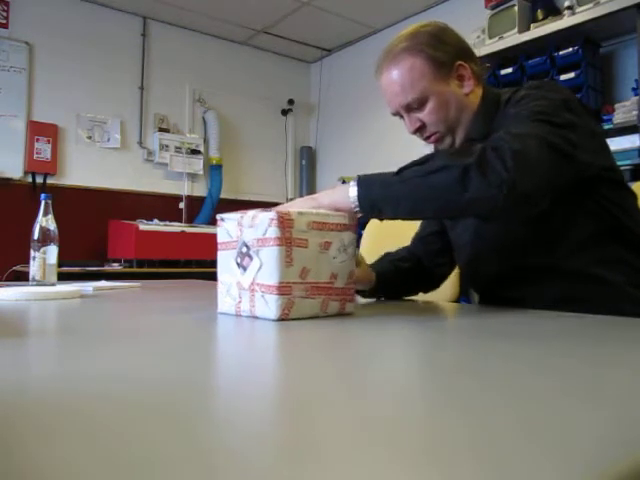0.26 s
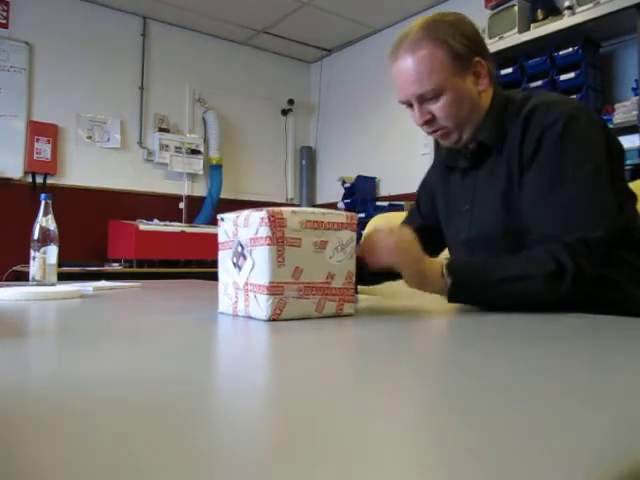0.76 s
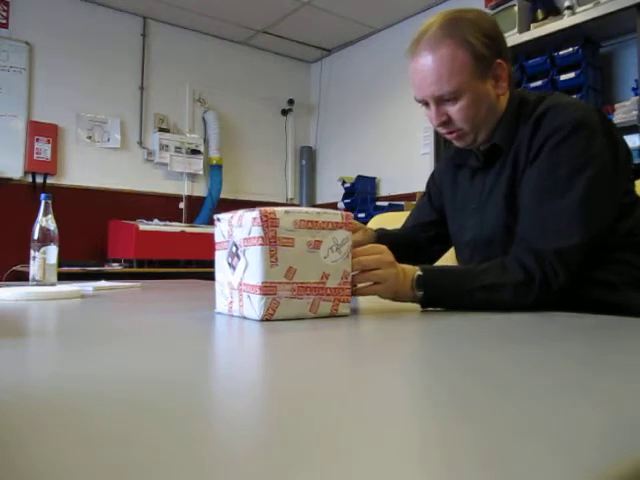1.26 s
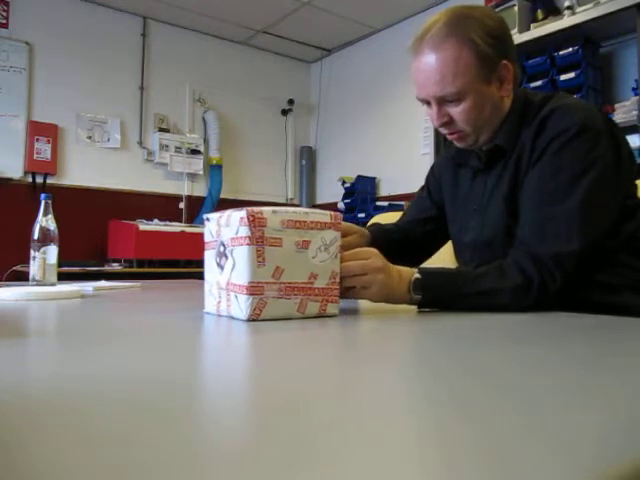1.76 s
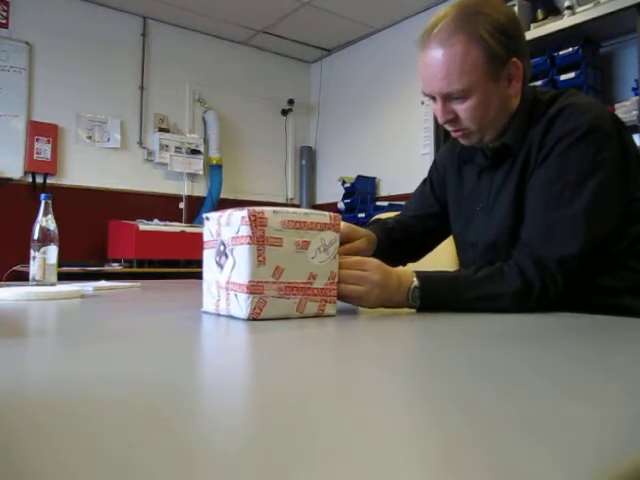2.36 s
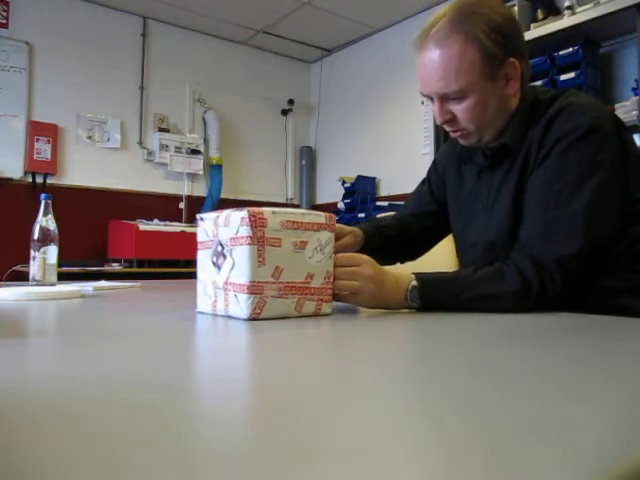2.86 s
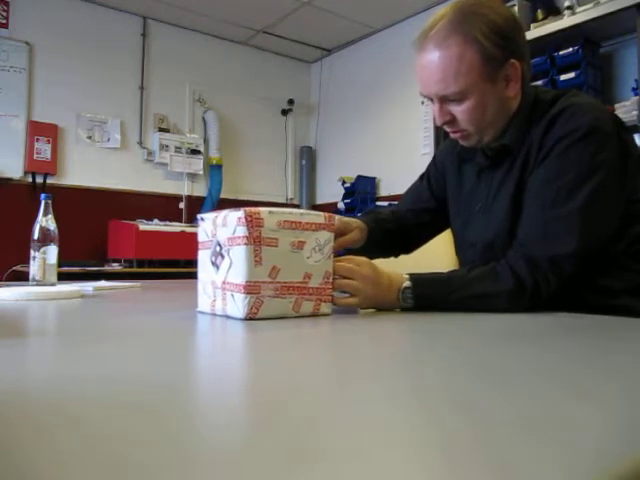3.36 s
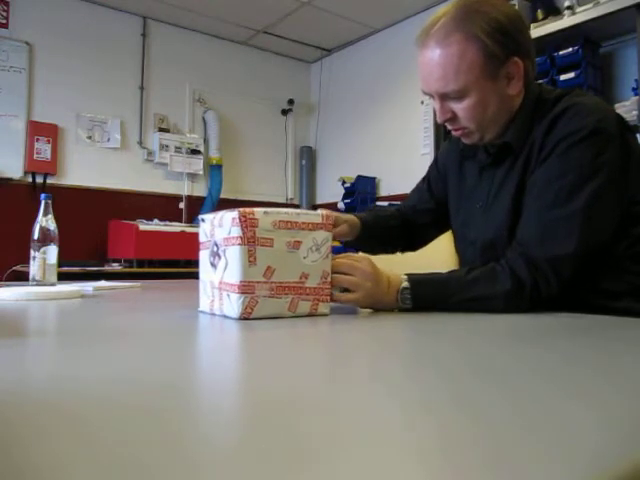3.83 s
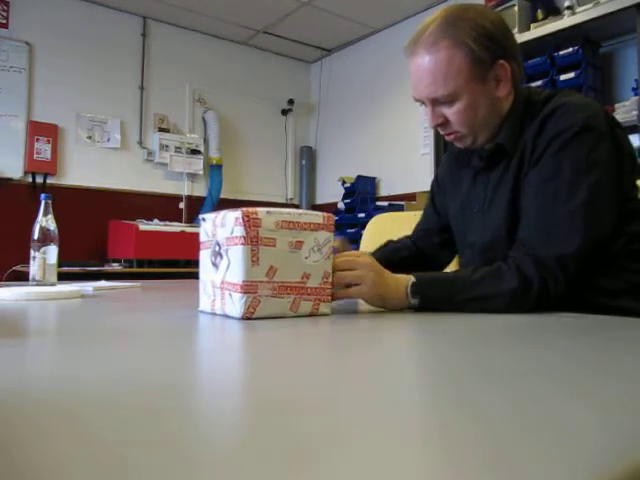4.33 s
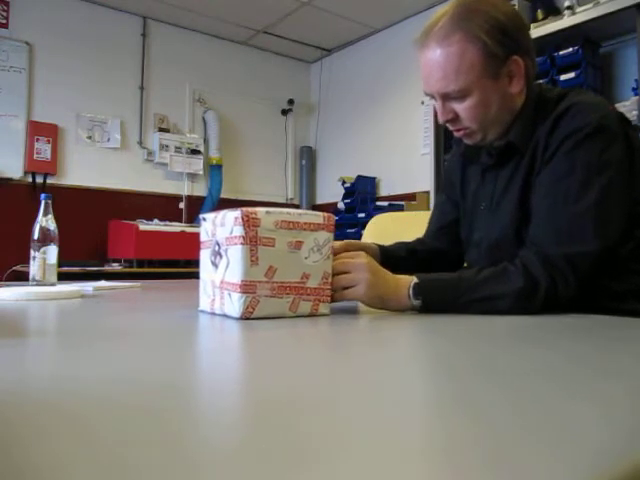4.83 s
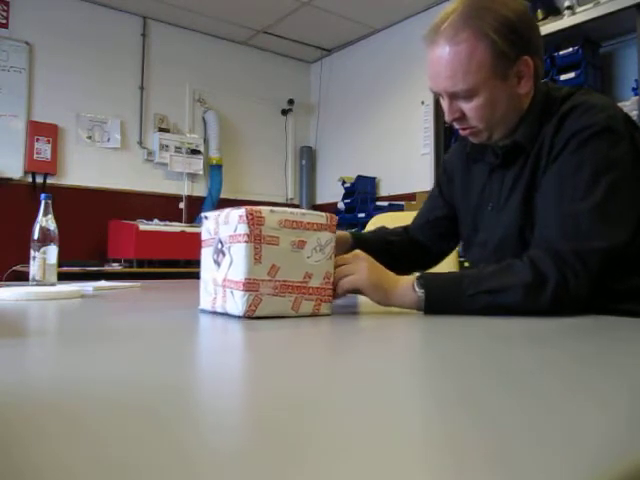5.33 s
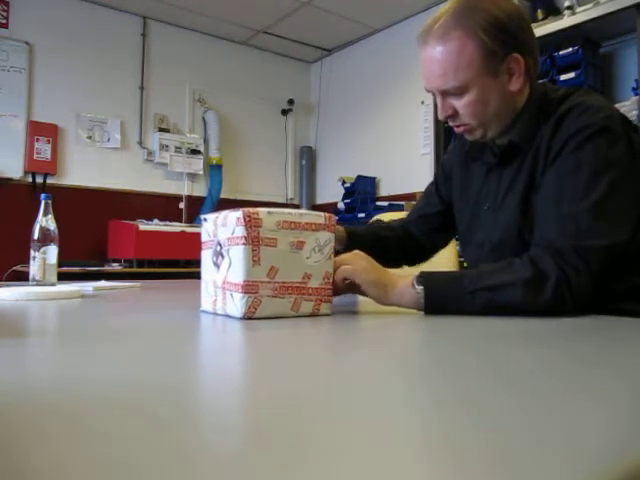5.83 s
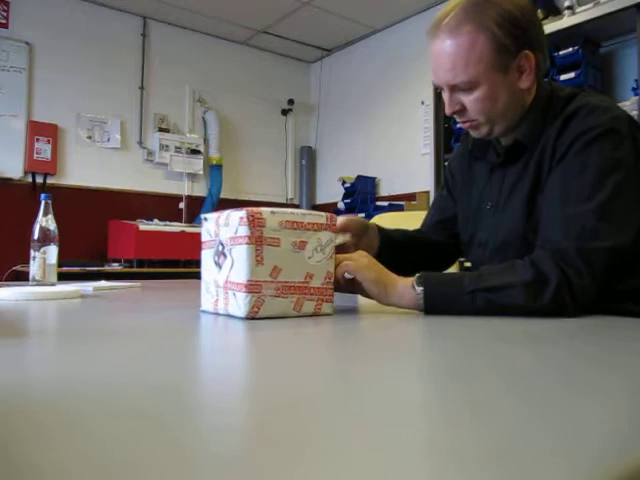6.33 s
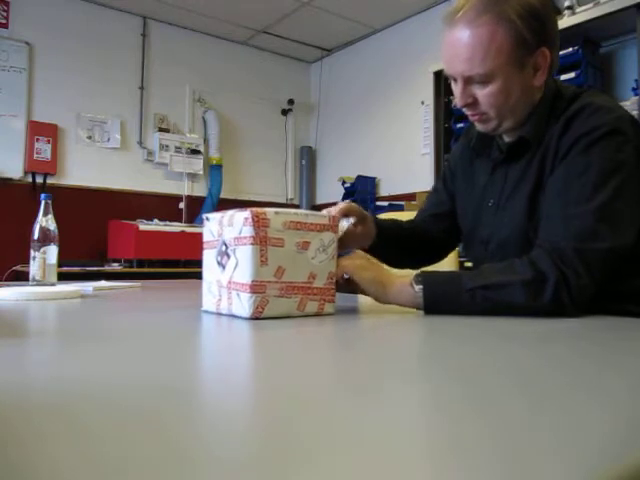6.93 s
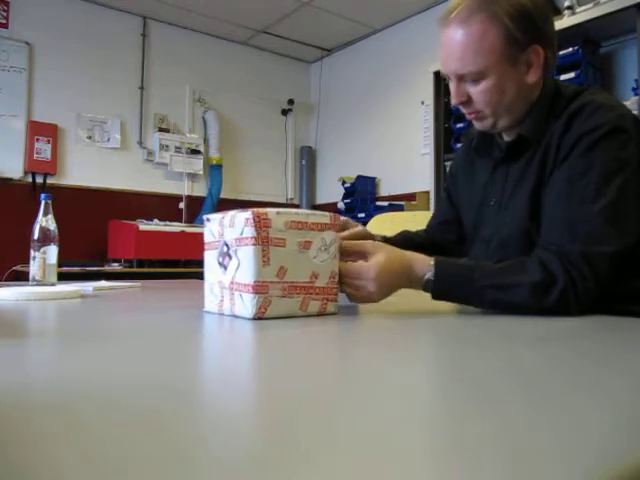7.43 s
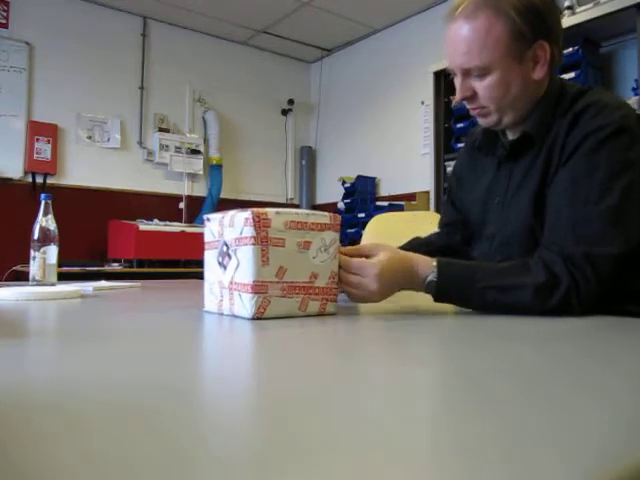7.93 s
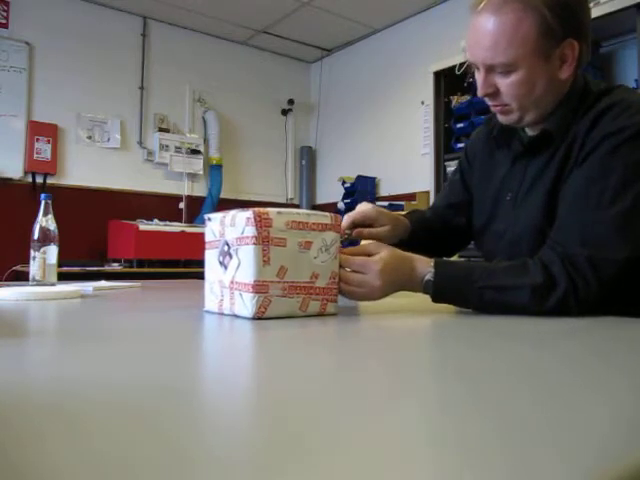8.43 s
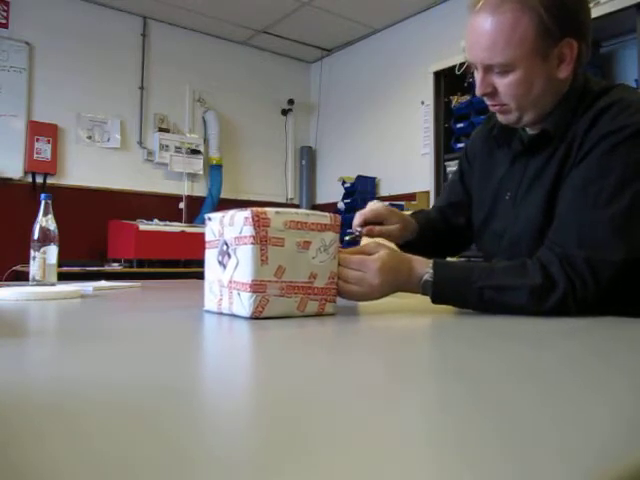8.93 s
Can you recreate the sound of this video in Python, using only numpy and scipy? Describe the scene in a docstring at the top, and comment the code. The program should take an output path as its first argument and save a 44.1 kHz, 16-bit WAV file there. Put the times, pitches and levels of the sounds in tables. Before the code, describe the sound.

A close microphone at a table in a quiet workshop, with faint hiss, low rumble and a short diffuse tail. From 0 to 0.4 s fingers brush grainily over paper wrapping, with small snaps and a dull box boom. At about 0.5 to 0.7 s a thin squeak leads into a woody, knocking chair creak. Around 1.2 s come tiny tape ticks, then soft rubbing and sparse crackles. A sharp bright snap lands at 2.46 s, and the rumble briefly dips. Gentle rustling swells near 3.6 s. At 4.23 to 4.31 s a taut flap pops four times quickly. From 5 to 7.1 s crinkling is busiest, crackling densely, with a strong snap at 6.62 s and dull box flexes. A weaker creak at 7.65 to 7.8 s precedes ticking tape runs until 8.5 s. Final rustles and crisp snaps cluster at 8.6 to 8.8 s, then fade to room air.

```python
"""A quiet workshop, heard from close to a table where hands pick open a paper-wrapped cardboard parcel.
Behind it lie faint air hiss, a low rumble whose level dips early on, one early echo and a short diffuse tail.
Twice something creaks dully, probably the chair: stick-slip knocks ring its frame as the sitter shifts.
Box walls boom as narrow noise, a taut flap pops as struck modes, and tape lets go in runs of tiny ticks.
Nearest, fingers rub the wrapping as grainy coloured noise, and creases snap as bursts with a ringing fold."""
import sys
import numpy as np
from scipy import signal
from scipy.fft import rfft, irfft, next_fast_len
from scipy.io import wavfile

SR = 44100
rng = np.random.default_rng(int(sys.argv[2]) if len(sys.argv) > 2 else 0)


def master_out(mix):
    """Clip the mix to full scale and print it as 16-bit PCM to the path in sys.argv[1]."""
    frames = np.transpose(np.atleast_2d(mix))
    ceiling = np.clip(frames, -1, 1)
    pcm = np.round(ceiling * 32767).astype(np.int16)
    wavfile.write(sys.argv[1], SR, pcm)


N = 405279
TIME = np.arange(N) / SR


def from_db(db):
    """Amplitude ratio of a level in dB."""
    return 10 ** (np.asarray(db) / 20)


def rms_one(x):
    """The signal scaled to rms 1."""
    return x / np.sqrt(np.mean(x ** 2) + 1e-20)


def in_time(rows):
    """Each column of a curve at every sample."""
    s, *columns = np.transpose(rows)
    return [np.interp(TIME, s, c) for c in columns]


def at_hz(points, hz, axis=1):
    """One column of a spectrum, read on a log-frequency axis."""
    points = np.array(points)
    return np.interp(np.log(hz), np.log(points[:, 0]), points[:, axis])


def pitched(rows, ratio):
    """The same modes or spectrum at another pitch."""
    return [(hz * ratio, *rest) for hz, *rest in rows]


def band(x, low, high, order=2):
    """Only the part between two frequencies in Hz."""
    sos = signal.butter(order, [low, min(high, .48 * SR)], "band", fs=SR, output="sos")
    return signal.sosfilt(sos, x + 1e-18)


def coloured(x, spectrum):
    """Gives a flat excitation a spectrum, rolled off below 20 Hz; rms 1."""
    size = next_fast_len(N)
    hz = np.maximum(np.arange(size // 2 + 1) * SR / size, 1)
    gain = from_db(at_hz(spectrum, hz)) * np.minimum(hz / 20, 1)
    return rms_one(irfft(rfft(x, size) * gain, size)[:N])


def drift(rate):
    """Smooth chance of spread 1, with `rate` new values per second."""
    return rms_one(np.interp(TIME * rate, np.arange(N // 20), rng.standard_normal(N // 20)))


def ring(clicks, hz, t60):
    """A resonator: a unit click sets a sine of height 1 ringing."""
    r = from_db(-60 / (t60 * SR))
    w = 2 * np.pi * hz / SR
    return signal.lfilter([0, np.sin(w)], [1, -2 * r * np.cos(w), r * r], clicks + 1e-18)


def strike(events, modes, vary_db, vary_pitch=0):
    """Every blow (t/s, level/dB) excites each mode with a strength, and perhaps a pitch, of its own."""
    hz, mode_db, t60 = np.transpose(modes)[:, :, None]
    t = TIME[:int(1.5 * t60.max() * SR)]
    out = np.zeros(N + SR)
    signs = (-1) ** np.arange(len(hz))[:, None]   # neighbouring modes start in opposite phase
    dying = signs * from_db(mode_db - 60 * t / t60)
    chances = rng.standard_normal((64, 2, len(hz), 1))
    for (s, db), (strength, detune) in zip(events, chances):
        sines = np.sin(2 * np.pi * hz * (1 + vary_pitch * detune) * t)
        rings = dying * from_db(db + vary_db * strength) * sines
        start = int(s * SR)
        out[start:start + len(t)] += rings.sum(axis=0)
    return out[:N]


def swell(t, rise, fall, depth_db, shape):
    """Level in dB of a gesture t seconds after its start: up to 0 dB, then away again."""
    away = np.maximum((rise - t) / max(rise, 1e-3), (t - rise) / max(fall, 1e-3))
    return -depth_db * np.abs(away) ** shape


# spectrum of the still air: f/Hz, relative level/dB per Hz
AIR = [(15, -38), (25, -1), (99, -6), (134, -7.5), (223, -11.5), (775, -16), (863, -20.5), (6050, -31),
       (7920, -29), (16000, -41)]
# level of the low rumble, which drops suddenly near 2.5 s and then partly returns: t/s, level/dB
RUMBLE_LEVEL = [(0, -54), (2.44, -53.5), (2.52, -68), (3.3, -57.5), (9.2, -59)]
AIR_DB = -57


def room_air(rumble_hz):
    """A faint steady hiss over a low rumble, both shaped from noise; the rumble's level dips and returns."""
    hiss = from_db(AIR_DB) * coloured(rng.standard_normal(N), AIR)
    rumble = rms_one(band(rng.standard_normal(N), rumble_hz / 2, rumble_hz * 2))
    return hiss + from_db(in_time(RUMBLE_LEVEL)[0]) * rumble


# diffuse tail of the workshop: f/Hz, t60/s, level/dB
ROOM = [(149, 0.71, -6), (600, 0.33, -3), (3970, 0.33, -12.5), (8900, 0.39, -3.5), (16000, 0.194, -35)]
# a near surface: delay t/s, gain (ratio)
ECHOES = [(0.014, 0.14)]


def workshop(x, build_s):
    """One near echo, and a diffuse tail that lasts longest in the bass and shortest at the very top."""
    t = TIME[:SR // 2]
    edges = np.geomspace(90, 18000, 12)
    response = np.zeros(len(t))
    for low, high in zip(edges, edges[1:]):
        hz = np.sqrt(low * high)
        fade = from_db(-60 * t / at_hz(ROOM, hz)) * (1 - np.exp(-t / build_s))
        level = from_db(at_hz(ROOM, hz, axis=2)) / np.sqrt(np.sum(fade ** 2))
        response += band(rng.standard_normal(len(t)), low, high) * fade * level
    for delay, gain in ECHOES:
        response[int(delay * SR)] += gain
    return signal.fftconvolve(x, response)[:N]


# a thin squeak before the first creak: t/s, length t/s, f/Hz, level/dB
SQUEAK = (.465, .024, 2180, -43)


def squeak(t60):
    """The joint rubs at one narrow pitch just before it breaks loose: noise through a resonator."""
    s, length, hz, db = SQUEAK
    rubbing_time = (TIME > s) & (TIME < s + length)
    rubbed = ring(rng.standard_normal(N) * rubbing_time, hz, t60)
    # the level holds over the squeak's own length
    return from_db(db) * rms_one(rubbed) * np.sqrt(length * SR / N)


# pushes on the creaking seat: start t/s, rise t/s, fall t/s, ring level/dB and groan level/dB (relative),
# slips per s, pitch ratio of the ring
PUSHES = [(0.4884, 0.0011, .01, -25.5, -47, 130, 0.94), (.5, 0.018, 0.022, -29, -60, 230, 0.98),
          (.52, 0.019, 0.042, -24.5, -56, 250, 1), (.552, .014, 0.061, -33, -46, 230, 1.1),
          (.615, 0.025, 0.009, -39, -45.5, 260, 1.28), (.72, .022, 0.018, -46, -64, 190, 0.94),
          (7.651, 0.0017, 0.061, -42.5, -45, 207, 0.97), (7.696, 0.0075, .02, -34.5, -56, 240, 0.89),
          (7.738, 0.019, 0.012, -39.5, -54, 230, 0.97), (7.783, 0.011, 0.019, -36.5, -55, 233, 0.795)]
# bright modes of the frame, before the pitch ratio: f/Hz, relative level/dB, t60/s
CREAK_RING = [(973, -4.5, 0.016), (1166, -1.5, 0.015), (1278, 1, 0.013), (1570, -1.5, 0.014),
              (2210, -16, 0.016), (3030, -13, 0.0049)]
# its low modes: f/Hz, relative level/dB, t60/s
CREAK_GROAN = [(136, -15, 0.012), (263, 6, 0.017), (424, 2.5, 0.042), (670, 13, 0.0098)]
PUSH_DEPTH_DB = 13   # a push climbs this far, then falls as far


def creak(jitter, ring_db, groan_db, soft_hz):
    """Under each push a joint sticks and slips unevenly; every slip is a soft knock that rings the frame."""
    frame = 0
    for start, rise, fall, bright_db, low_db, slips_per_s, pitch in PUSHES:
        waits = np.exp(jitter * rng.standard_normal(size=40)) / slips_per_s
        t = np.cumsum(waits)
        t = t - t[len(t) // 2] + rise   # one slip comes at the height of the push
        t = t[(t >= 0) & (t <= rise + 1.4 * fall)]
        db = swell(t, rise, fall, PUSH_DEPTH_DB, 1)
        bright = np.c_[start + t, db + bright_db + ring_db]
        low = np.c_[start + t, db + low_db + groan_db]
        frame = frame + strike(bright, pitched(CREAK_RING, pitch), vary_db=4)
        frame = frame + strike(low, CREAK_GROAN, vary_db=2)
    return band(frame, 79, soft_hz, order=3)


# box walls booming dully as they are pressed: start t/s, rise t/s, fall t/s, f/Hz, peak level/dB
FLEXES = [(.185, 0.0085, 0.11, 232, -39.5), (3.63, 0.033, 0.11, 250, -39.5), (6.05, 0.033, 0.024, 265, -38),
          (6.15, 0.017, 0.032, 490, -35), (6.765, 0.014, 0.052, 560, -43.5), (8.715, 0.037, 0.11, 377, -42)]


def flexing(width, depth_db):
    """A pressed wall of the box rumbles in a narrow band of noise that swells and fades."""
    noise = rng.standard_normal(N)
    out = np.zeros(N)
    for s, rise, fall, hz, db in FLEXES:
        rumble = rms_one(band(noise, hz / (1 + width), hz * (1 + width)))
        out = out + from_db(db + swell(TIME - s, rise, fall, depth_db, 1)) * rumble
    return out


# the flap popping against the box: t/s, relative level/dB, pitch ratio (a taut flap rings higher)
KNOCKS = [(4.2314, -6, 1.05), (4.2551, -5.5, 0.94), (4.284, -14.5, 1), (4.3063, -14, 1)]
# the box and its taut wrapping, before the pitch ratio: f/Hz, relative level/dB, t60/s
BOX = [(269, -19, 0.18), (418, -25, 0.054), (902, -18, 0.045), (1110, 1, 0.004), (1210, -28, 0.02),
       (1550, 1, 0.0091), (1710, -13.5, 0.096), (1910, -4, 0.017)]
# the flap shivering after each pop, before the pitch ratio: f/Hz, relative level/dB per Hz
SHIVER = [(150, -40), (400, -11.5), (1100, 0), (1750, -5), (2300, -9), (2900, -6.5), (4500, -6.5),
          (8000, -23), (16000, -56)]


def flap(pop_db, shiver_db, shiver_t60):
    """Each pop strikes the box and leaves the crumpled sheet shivering for a moment as fading noise."""
    pops = shiver = 0
    for s, db, pitch in KNOCKS:
        pops = pops + strike([(s, db)], pitched(BOX, pitch), vary_db=2.5)
        shaking = (TIME > s) * from_db(db - 60 * np.abs(TIME - s) / shiver_t60)
        shiver = shiver + shaking * coloured(rng.standard_normal(N), pitched(SHIVER, pitch))
    return from_db(pop_db) * band(pops, 430, 3330) + from_db(shiver_db) * shiver


# tape letting go of the paper in runs of ticks: start t/s, length t/s, ticks per s at first,
# relative level/dB of the first tick, low ring f/Hz, low ring level/dB, high ring f/Hz
PEELS = [(1.167, .005, 100, -26, 5600, -11, 9300), (1.176, .015, 90, -20, 5600, -12, 9400),
         (7.849, .022, 105, -42, 4800, 4, 9000), (7.888, .045, 90, -34, 4900, 0, 9100),
         (7.942, .053, 80, -29, 5350, -5, 9200), (8.017, .072, 96, -27.5, 5400, -6, 9200),
         (8.1, .055, 92, -33, 5100, -2, 10300), (8.202, .039, 52, -31, 5650, -5, 10300),
         (8.3185, .03, 44, -35, 5700, -5, 10200), (8.409, .019, 77, -34.5, 5700, -5, 10100),
         (8.51, .02, 67, -35, 5700, -5, 10100)]
# overtone of the high ring: pitch ratio, relative level/dB, t60/s
TAPE_OVERTONE = (1.3, -2, 0.0011)
TAPE_LOW_T60_S, TAPE_HIGH_T60_S = 0.0022, 0.0039
PEEL_FADE_DB = 6   # the tension eases over each run
PEEL_HURRY = .86   # below 1 the ticks come ever faster
TICK_VARY_DB, TICK_VARY_PITCH = 2, 0.018   # no two ticks are quite alike


def peeling(hollow_hz, hollow_width_hz):
    """Each run ticks ever faster and weaker; the strip's rings shift from run to run, a hollow between them."""
    out = np.zeros(N)
    over_ratio, over_db, over_t60 = TAPE_OVERTONE
    for s, length, rate, db, low_hz, low_db, high_hz in PEELS:
        t = np.arange(12) ** PEEL_HURRY / rate
        t = t[t < length]
        modes = [(low_hz, low_db, TAPE_LOW_T60_S),
                 (high_hz, -3.5, TAPE_HIGH_T60_S),
                 (high_hz * over_ratio, over_db, over_t60)]
        ticks = np.c_[s + t, db - PEEL_FADE_DB * t / length]
        out = out + strike(ticks, modes, TICK_VARY_DB, TICK_VARY_PITCH)
    notch = signal.iirnotch(hollow_hz, hollow_hz / hollow_width_hz, fs=SR)
    return band(signal.lfilter(*notch, out), 2000, 14800)


def friction(grains_per_s, spread_db, grain_share):
    """Fibres catching and breaking: separate grains of uneven size in a fine noise."""
    sizes = from_db(spread_db * np.minimum(rng.exponential(1, N), 4))
    caught = rng.random(N) < grains_per_s / SR
    grains = rms_one(caught * sizes * rng.choice([-1, 1], N))
    share = np.clip(grain_share, 0, 1)   # of the power
    return np.sqrt(share) * grains + np.sqrt(1 - share) * rng.standard_normal(N)


# strokes of the fingers over the paper: start t/s, rise t/s, fall t/s, relative hiss level/dB,
# relative level/dB of the sheet's body as it is pressed
STROKES = [(-.05, 0.058, 0.092, -40, -51), (.11, 0.064, 0.17, -34.5, -46), (.16, 0.096, 0.26, -33.5, -48.5),
           (.5, 0.06, 0.18, -51, -44), (.8, 0.17, 0.13, -57, -68), (1.14, 0.073, 0.27, -43, -55.5),
           (1.26, 0.067, 0.19, -35.5, -47), (1.515, 0.016, 0.65, -48, -55), (2.08, 0.13, 0.18, -46, -59),
           (2.33, 0.17, 0.19, -47.5, -45.5), (2.55, 0.046, 0.21, -46, -77), (2.84, 0.22, 0.35, -54.5, -52),
           (3.42, 0.054, 0.25, -48.5, -53), (3.55, 0.12, 0.12, -38, -40), (3.7, 0.17, 0.32, -54, -51.5),
           (4.4, 0.15, 0.12, -55, -48), (4.77, 0.033, 0.42, -50, -48.5), (4.99, 0.073, 0.2, -39, -37),
           (5.12, 0.11, 0.12, -57, -38.5), (5.29, 0.15, 0.1, -35, -32), (5.53, 0.023, 0.11, -42, -50),
           (5.77, 0.049, 0.3, -46, -47.5), (5.9, 0.057, 0.052, -40, -41.5), (6, 0.06, 0.18, -55, -40.5),
           (6.11, 0.07, 0.1, -41, -40), (6.2, 0.18, 0.051, -37, -36), (6.42, 0.024, 0.085, -48.5, -37),
           (6.519, 0.089, 0.068, -33.5, -37.5), (6.94, .06, 0.49, -52, -49.5),
           (7.06, 0.043, 0.14, -39, -36.5), (7.17, 0.15, 0.066, -48, -59), (7.85, 0.11, 0.074, -48.5, -68),
           (8.6, 0.036, 0.24, -44, -49), (8.66, 0.062, 0.15, -39.5, -43)]
# the hands never quite rest on the paper: t/s, relative hiss level/dB, relative body level/dB
HOLDING = [(0, -59.5, -61), (4.6, -58, -58.5), (4.72, -65.5, -67.5), (4.9, -63, -51.5), (7, -55, -59.5),
           (7.5, -59, -60.5), (8.5, -74, -64.5), (9.19, -84, -67)]
STROKE_DEPTH_DB, STROKE_SHAPE = 26, 1.203   # climbs this far, then falls as far; shape 1 is pointed, 2 is round


def hand_effort():
    """Gains of hiss and body: the strokes add in power to the light touch of the holding hands."""
    t = TIME[::40]   # gestures are slow enough for a coarse clock
    s, *held = np.transpose(HOLDING)
    power = from_db([np.interp(t, s, db) for db in held]) ** 2
    for start, rise, fall, *db in STROKES:
        gesture_db = swell(t - start, rise, fall, STROKE_DEPTH_DB, STROKE_SHAPE)
        power = power + from_db(np.array(db)[:, None] + gesture_db) ** 2
    return [np.interp(TIME, t, np.sqrt(p)) for p in power]


# colour of the light rubbing: f/Hz, relative level/dB per Hz
HISS = [(1000, -16.5), (2000, -9), (3200, -0.5), (7000, -1.5), (9300, 1.5), (11000, -7), (13000, -16.5),
        (16000, -30)]
# colour of the pressed sheet: f/Hz, relative level/dB per Hz
BODY = [(90, -41), (180, -3.5), (250, 9.5), (320, -2), (430, 2), (850, -3), (1500, 1), (2600, -2),
        (8000, -30)]
CRINKLES_PER_S, CRINKLE_DB = 40, -8   # tiny stray folds giving way under the fingers


def rubbing(hiss_db, body_db, crackle_db, flutter_db):
    """Light strokes hiss with stray crinkles; a pressed sheet crackles and sounds with its whole body."""
    hiss, body = hand_effort()
    sliding = friction(grains_per_s=3000, spread_db=5.0, grain_share=.2)
    crumpling = friction(grains_per_s=330, spread_db=3.0, grain_share=0.31)
    stray = friction(grains_per_s=CRINKLES_PER_S, spread_db=5.0, grain_share=1)
    pressed = from_db(body_db) * coloured(crumpling, BODY) + from_db(crackle_db) * coloured(crumpling, HISS)
    light = from_db(hiss_db) * coloured(sliding, HISS) + from_db(CRINKLE_DB) * coloured(stray, HISS)
    flutter = from_db(flutter_db * drift(220))
    return (hiss * light + body * pressed) * flutter


# creases snapping: t/s, relative level/dB, brightness/dB per octave, fold f/Hz,
# relative level/dB of the box's thump, relative length/ms
SNAPS = [(0.0108, -30, 4, 4000, -39.5, 0.93), (0.1877, -26.5, 1.5, 1830, -27, 2.8),
         (0.3654, -41.5, 0, 1820, -32.5, 4.4), (0.608, -31, 5, 3160, -51, 2.9),
         (1.142, -41.5, 2.5, 3020, -54, 1.2), (1.196, -39, 12, 9500, -66, 1.2),
         (1.204, -37, 10, 9800, -62, 0.91), (1.3246, -27.5, 2, 2820, -36, 1.1),
         (1.3776, -37.5, 11, 8950, -63, 1.1), (1.468, -55, -4, 1900, -36.5, 0.99),
         (1.6221, -49, -4.5, 5860, -36, 1.4), (1.8758, -45, -1.5, 5900, -35.5, 1.6),
         (2.4589, -17, 4.5, 9800, -28, 0.84), (2.473, -32.5, 5, 2020, -40, 2.3),
         (2.77, -31.5, 5.5, 1630, -62, 1), (2.798, -36.5, 4.5, 1730, -64, 2.2),
         (2.8654, -39, 3.5, 6200, -66, 0.21), (2.914, -42, 1, 6200, -62, 4),
         (3.1219, -49, -3, 453, -42, 2.4), (3.2801, -38.5, -2.5, 1810, -37, 0.63),
         (3.453, -38, 1.5, 2670, -40, 1.5), (3.8899, -41, -4, 2400, -40, 0.8),
         (4.0928, -56, 0, 790, -30, 2.7), (4.2323, -23, -3, 1990, -31, 1.6),
         (4.2557, -30, 4.5, 1010, -17.5, 5.2), (4.2824, -23.5, -2.5, 3940, -22.5, 2.3),
         (5.0895, -34, -7, 2760, -26, 1.05), (5.0998, -32, 2.5, 7000, -41, 0.49),
         (5.4158, -34.5, -6, 1740, -52, .8), (5.4537, -24, 3.5, 6900, -50, 0.88),
         (5.4957, -36, -2, 4140, -44, .8), (5.519, -25.5, 1, 5000, -53, 1),
         (5.5512, -31.5, 1, 2020, -35, 6.9), (5.573, -31.5, -0.5, 5870, -38, 1.7),
         (5.821, -38, 8, 9150, -56, 0.63), (5.8535, -31.5, 3, 4670, -58, 0.31),
         (5.8778, -35.5, 5, 7550, -54, .2), (5.939, -32.5, 6, 8300, -64, .7),
         (5.9523, -27.5, 1, 7740, -64, 0.66), (6.038, -36.5, -2, 3200, -50, 0.77),
         (6.145, -34.5, -1.5, 4770, -51, 0.76), (6.172, -33.5, -4, 1860, -37, 2.2),
         (6.2695, -31.5, -1.5, 4500, -32.5, 2.7), (6.2937, -26, -0.5, 4560, -31, 1.2),
         (6.322, -28, -1.5, 8550, -42, 0.83), (6.354, -25.5, 0, 2900, -47, 1.2),
         (6.373, -35, 1, 2170, -40, 1.3), (6.427, -28, -4, 1550, -39, 2.6),
         (6.569, -33, -4, 2800, -51, 1.4), (6.5988, -35, -6, 8500, -40, 0.55),
         (6.6183, -17.5, 5, 2330, -27.5, 0.64), (6.6209, -28.5, -0.5, 2200, -39, 1.5),
         (6.636, -32, 7, 9700, -44, 0.33), (6.6628, -33.5, 9.5, 9200, -61, 0.72),
         (6.7676, -40.5, 0.5, 2670, -37, 0.37), (6.9434, -35, 5, 4970, -39.5, 0.93),
         (7.092, -33, -2, 1400, -33, 2), (7.099, -26.5, -2.5, 2850, -40, 1.3),
         (7.1023, -30.5, -4, 3840, -34, .7), (7.133, -21.5, -1.5, 5040, -47, 1.3),
         (7.378, -42, 1.5, 1870, -68, 3.3), (8.0904, -34, 3.5, 2930, -60, 0.79),
         (8.5846, -29.5, 2, 5800, -61, 0.81), (8.6198, -26.5, 1.5, 3330, -52, 1.8),
         (8.6755, -33.5, -2, 7140, -36, 2.7), (8.7176, -21, 6, 4060, -24, 1.1),
         (8.725, -33, 11, 8950, -49, .6), (8.742, -31, 11, 9400, -40, .6),
         (8.8034, -32.5, 2.5, 1640, -34, 24)]
# bands of a snap, the thump first: low f/Hz, high f/Hz
SNAP_BANDS = [(170, 900), (900, 3000), (3000, 7000), (7000, 11500)]
SNAP_PIVOT_HZ = 4600   # brightness tilts the treble about this pitch
FOLD_DB, FOLD_CYCLES = 3, 17   # a fold's level against its snap, cycles until it has died


def snap_bands():
    """The box thumps in the lowest band, brightness tilts the rest: rows t/s, band dB, fold dB, length/ms."""
    s, db, brightness, _, thump, ms = np.transpose(SNAPS)
    octaves = np.log2(np.sqrt(np.prod(SNAP_BANDS[1:], axis=1)) / SNAP_PIVOT_HZ)
    treble = db[:, None] + np.outer(brightness, octaves)
    return np.c_[s, thump, treble, db + FOLD_DB, ms]


def snaps(gain_db, decay, follow_db, scatter_s, vary_db):
    """A crease buckles in a short noise burst and its fold rings briefly; smaller folds give way just after."""
    size = 1024
    window = .005 * SR   # levels are rms over 5 ms
    ms = np.arange(size) / SR * 1000
    out = np.zeros(N + size)
    main = snap_bands()
    small = np.repeat(main, 3, axis=0)   # three followers each
    chance = rng.standard_normal(small.shape)
    small[:, 0] += scatter_s * np.abs(chance[:, 0])
    small[:, 1:-1] += follow_db + vary_db * chance[:, 1:-1]
    rows = np.r_[main, small]
    dying = np.exp(-decay * ms / np.maximum(rows[:, -1:], .2))
    bursts = rng.standard_normal((len(rows), size)) * dying
    sound = 0
    for k, (low, high) in enumerate(SNAP_BANDS):
        part = band(bursts, low, high, order=3)
        part_rms = np.sqrt(np.sum(part ** 2, axis=1, keepdims=True) / window)
        sound = sound + part * from_db(rows[:, k + 1, None]) / part_rms
    pitches = np.array(SNAPS)[:, 3]
    pitches = np.r_[pitches, rng.choice(pitches, len(small))]
    for s, snap, burst, hz, fold_db in zip(rows[:, 0], sound, bursts, pitches, rows[:, -2]):
        fold = band(ring(burst, hz, FOLD_CYCLES / hz), hz / 2, 11500)
        snap = snap + from_db(fold_db) * fold / np.sqrt(np.sum(fold ** 2) / window)
        start = max(int(s * SR), 0)
        out[start:start + size] += snap
    return from_db(gain_db) * out[:N]


def scene():
    """The direct sounds from the table and chair, their reply from the workshop, and the room's own air."""
    air = room_air(rumble_hz=67.4)
    chair = creak(jitter=.25, ring_db=6.0, groan_db=6.0, soft_hz=3330) + squeak(t60=0.016)
    box = flap(pop_db=-2.0, shiver_db=-14.5, shiver_t60=0.13) + flexing(width=0.34, depth_db=21.5)
    tape = from_db(5.0) * peeling(hollow_hz=6800, hollow_width_hz=1100)
    paper = rubbing(hiss_db=1.48, body_db=0.0, crackle_db=-3.0, flutter_db=2.5)
    paper = paper + snaps(gain_db=-4.5, decay=0.8, follow_db=-16.5, scatter_s=0.013, vary_db=5.0)
    into_room = from_db(-5.5) * (paper + box) + from_db(-2.5) * tape + from_db(0.5) * chair
    return (paper + tape + box + chair + workshop(into_room, build_s=0.002) + air)[None]


CUTOFF_HZ = 16000


def record(dry):
    """The loudest peaks are softly rounded to stay below full scale, and the top ends steeply at the recorder's
    cut-off."""
    rounded = dry / (1 + (dry / .8) ** 6) ** (1 / 6)
    return signal.sosfilt(signal.ellip(10, .1, 80, CUTOFF_HZ, fs=SR, output="sos"), rounded)


dry = scene()
out = record(dry)
master_out(out)
```